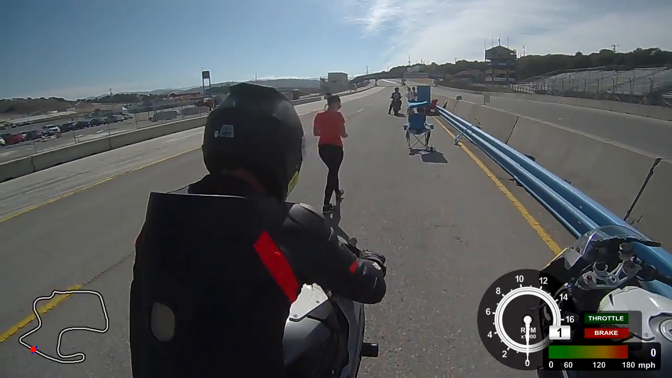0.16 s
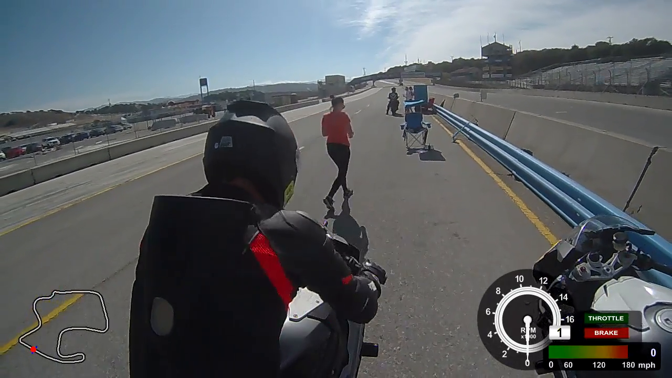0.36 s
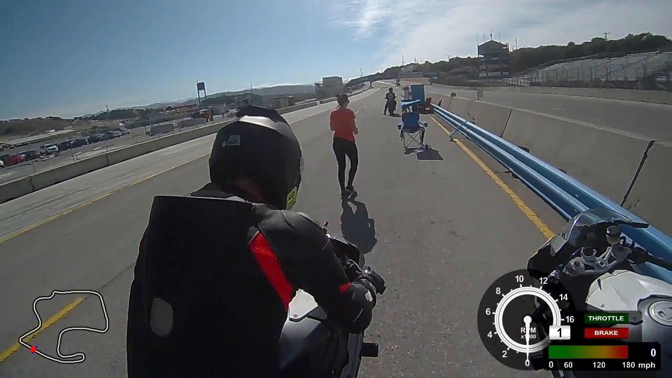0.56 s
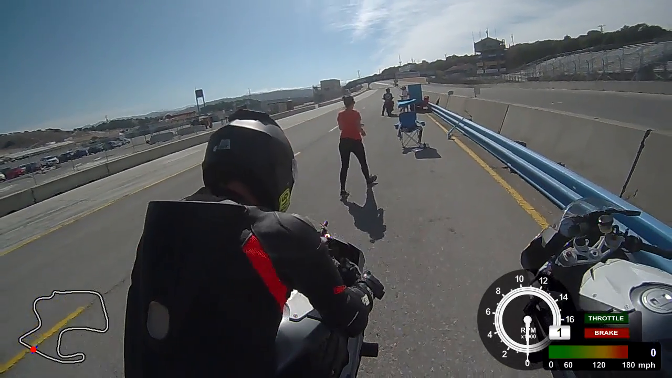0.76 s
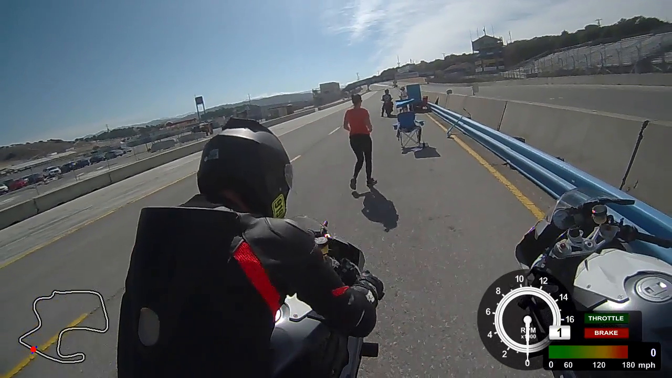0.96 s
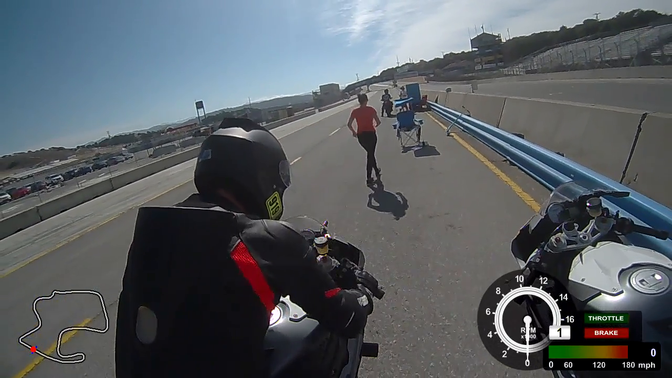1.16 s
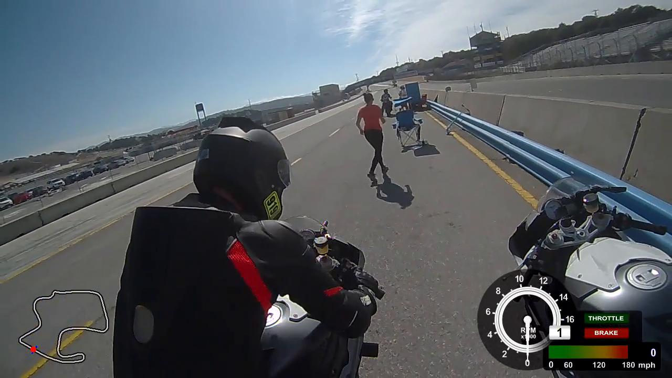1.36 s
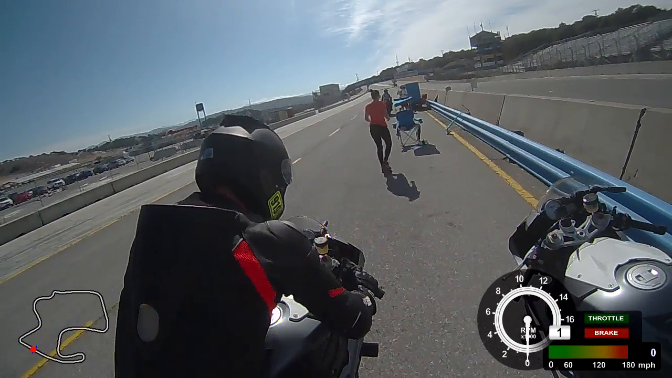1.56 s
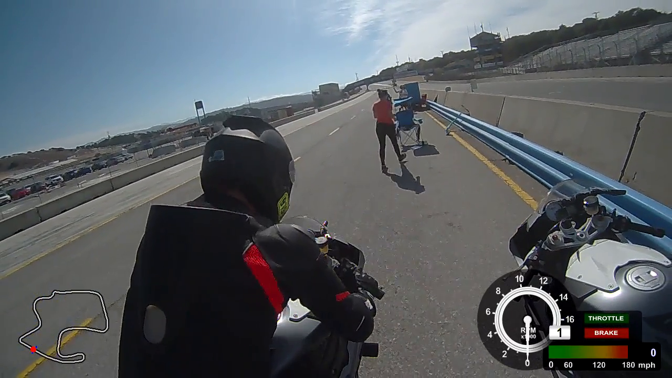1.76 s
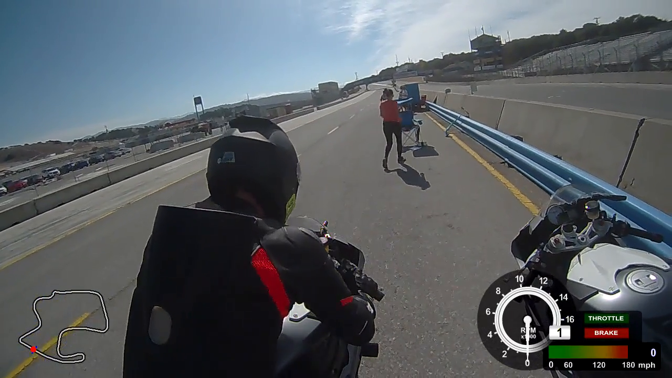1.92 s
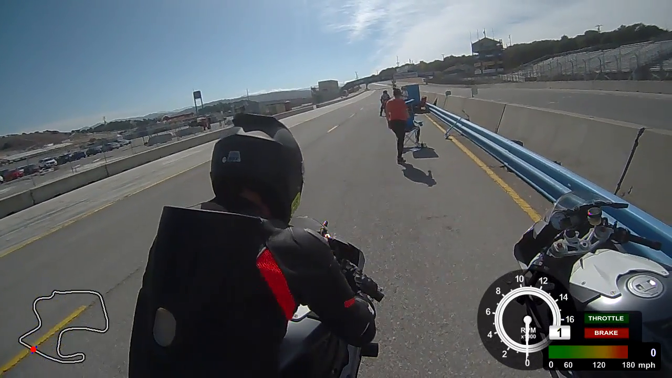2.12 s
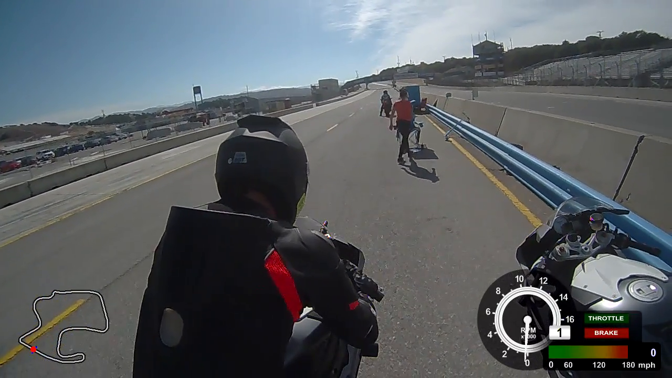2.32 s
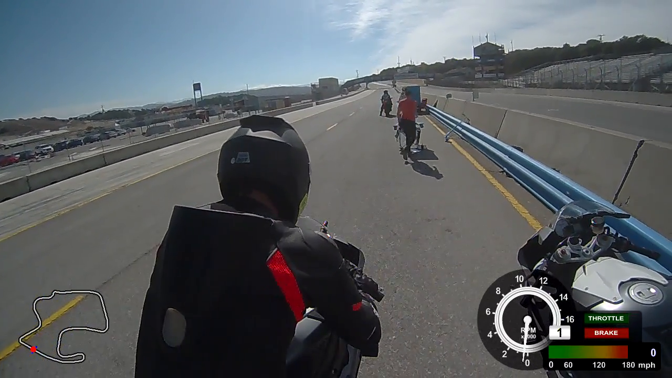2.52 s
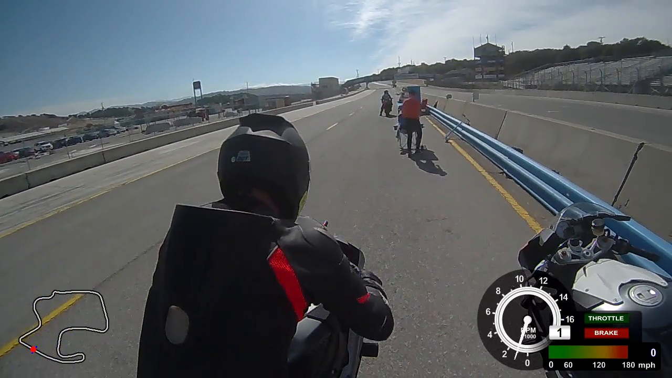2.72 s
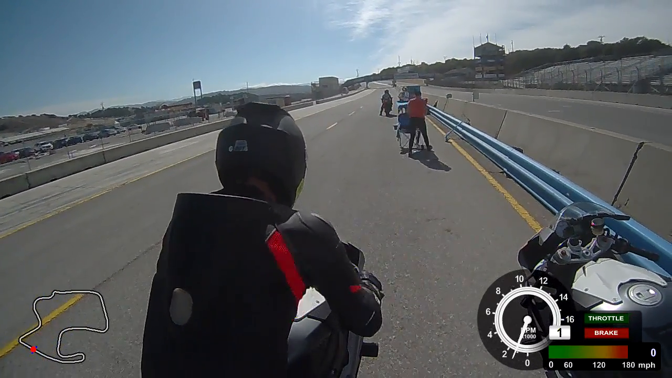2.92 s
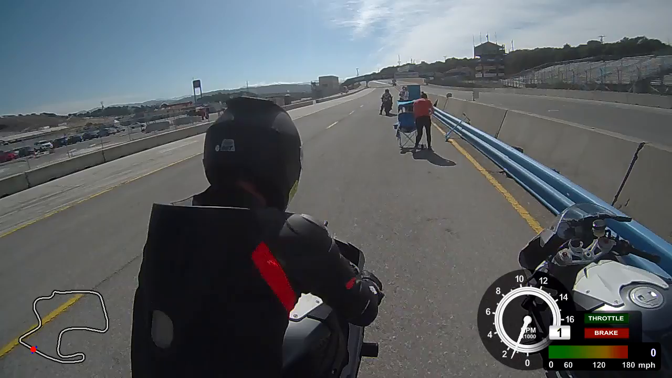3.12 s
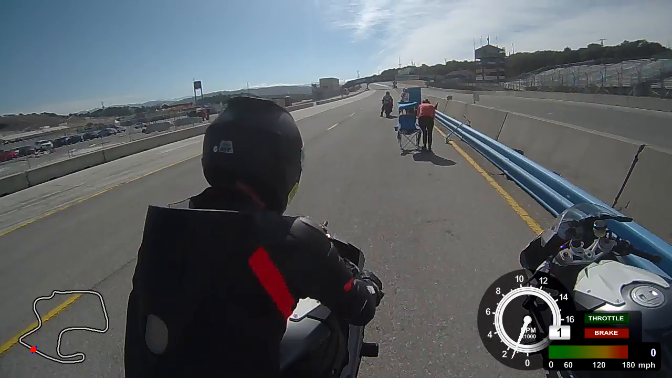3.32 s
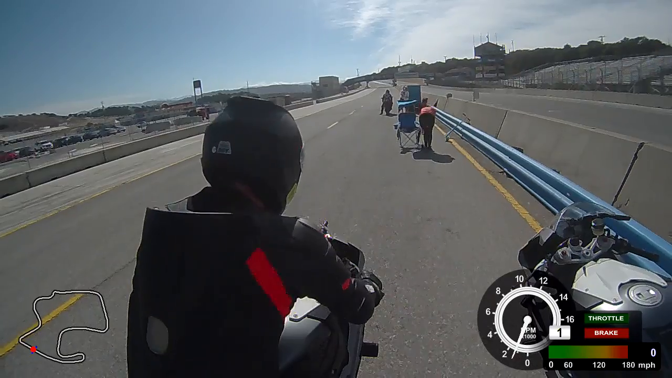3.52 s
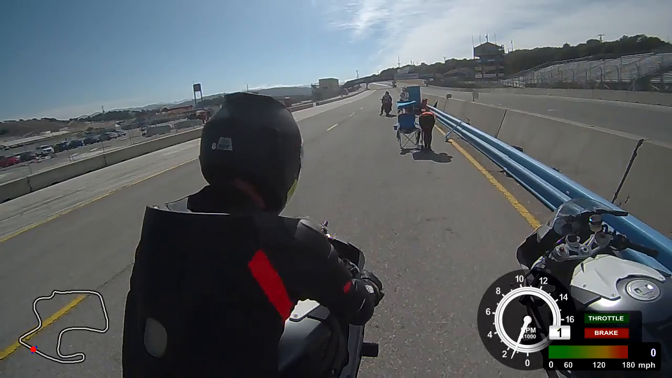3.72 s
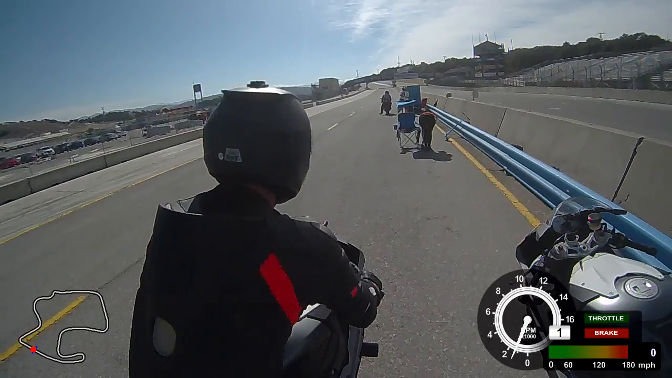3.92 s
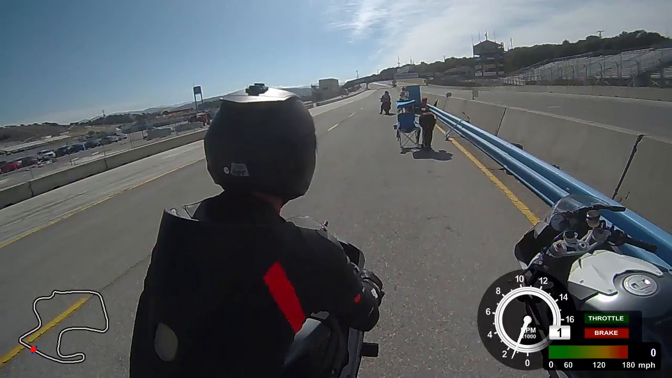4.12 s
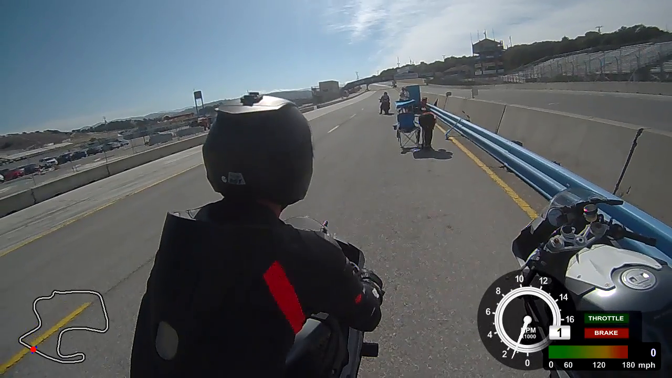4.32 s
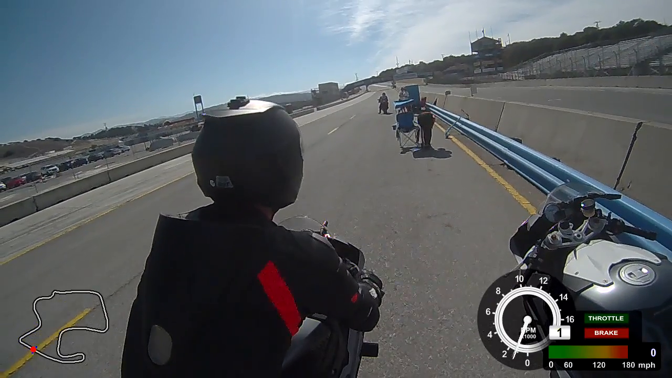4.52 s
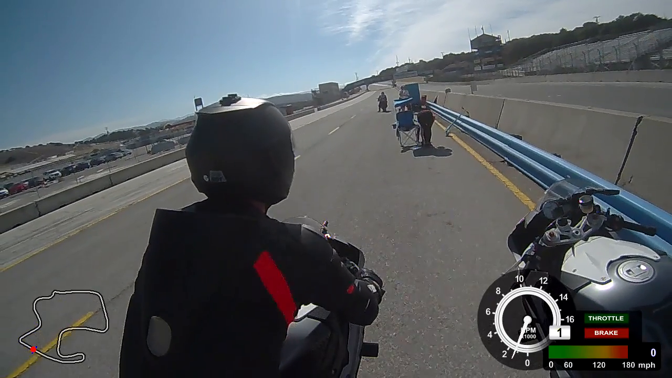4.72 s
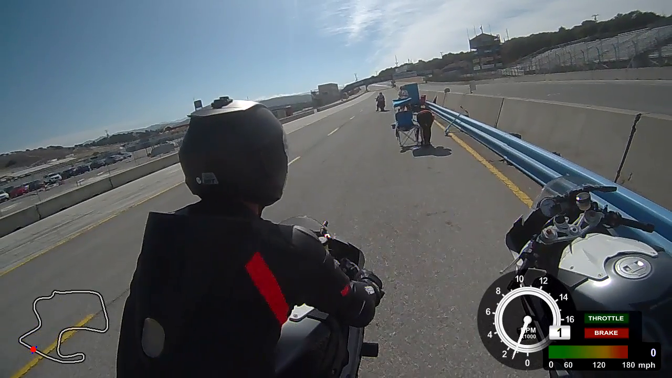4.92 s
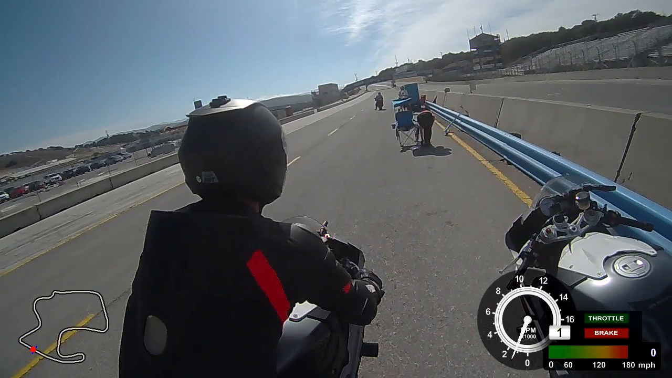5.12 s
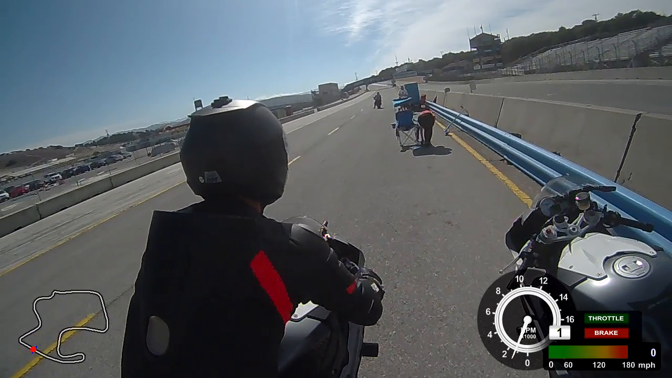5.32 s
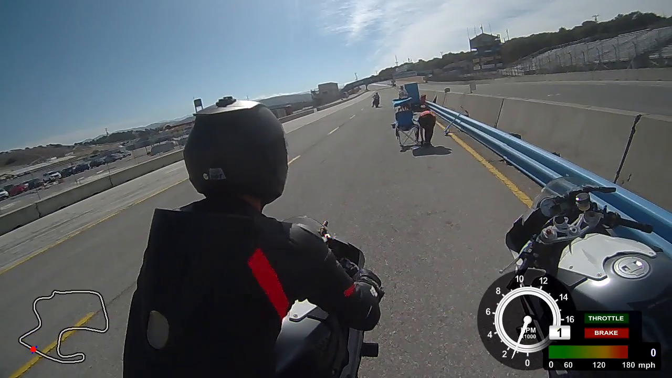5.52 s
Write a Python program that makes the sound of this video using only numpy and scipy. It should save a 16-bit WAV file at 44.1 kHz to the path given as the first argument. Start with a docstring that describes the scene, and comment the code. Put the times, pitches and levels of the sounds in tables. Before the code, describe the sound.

Close, mounted on the motorcycle: faint open-air wash with a few dull thuds and light taps, then a loud ringing metal clunk. The starter whines and grinds through several quick compressions, the four-cylinder engine catches with a small flare, and settles to a rattling idle with low exhaust putter and ticking valves until the end.

```python
"""In an open pit lane, a four-cylinder sport motorcycle clunks, is cranked, catches and settles to a rattling idle.
The microphone rides on a rigid mount, so knocks, starter gears and clatter are pulses, noise and tones
coloured by ringing resonances of the bodywork.
The exhaust putters underneath, puffs and firing orders filtered by the pipe, with dull thuds and light
taps before it, all over a faint wash of shaped noise."""
import sys
import numpy as np
from scipy import signal
from scipy.fft import rfft, irfft
from scipy.io import wavfile

SR = 44100
rng = np.random.default_rng(int(sys.argv[2]) if len(sys.argv) > 2 else 0)


def store_pcm(level_fs):
    """Save levels as 16-bit WAV."""
    pcm = np.round(np.clip(level_fs, -1, 1) * 32767).astype(np.int16)
    wavfile.write(sys.argv[1], SR, np.atleast_2d(pcm).T)


N = 250047
TIME = np.arange(N) / SR  # seconds
BINS = np.fft.rfftfreq(16384, 1 / SR)  # Hz, grid on which the filters are drawn

# Resonances of bodywork and mount. Each row: centre in Hz, half width in Hz, relative level in dB.
FRAME_MODES = [(553.5, 30.4, -10.5), (633, 49, -16), (780.6, 44, -11), (836, 21, -14.5), (978, 112, -12),
               (1110, 11, -12), (1209.6, 50.4, -7), (1344, 59, -12), (1446, 84, -17), (1613.7, 26, 1),
               (1704, 55, -8.5), (1926, 130, -24.5), (2306, 100, -19.5), (2427, 21, -20),
               (2791, 118, -14.5), (3095, 78, -20), (3526, 77, -14), (3840, 36, -15), (4095, 105, -9),
               (4328, 42, -8), (4680, 64, -19.5), (4970, 170, -23), (5310, 70, -24), (5740, 140, -19.5),
               (5980, 830, -40), (6100, 99, -23.5), (6300, 150, -57), (8300, 210, -58)]
# Resonances of the exhaust. Each row: centre in Hz, half width in Hz, relative level in dB.
PIPE_MODES = [(97, 38, -15.5), (123.8, 15, -5), (166.7, 16, 3.5), (210, 15, -2), (235.2, 13.4, 4.5),
              (250, 19, 0), (287.5, 12, 1), (303.6, 7.6, 0), (340.6, 10.7, 3.5), (370.3, 18.7, 0.5),
              (386, 29, -9), (434.7, 26, -0.5), (541.3, 9.6, -5)]
# Strength of each cylinder in firing order, relative, in dB.
CYLINDER_LEVELS = [0.7, -2, -3, -3.5]


def amp(db):
    """Decibels to gain."""
    return 10 ** (np.asarray(db) / 20)


def unit(x):
    """Scales to an rms of one."""
    return x / np.sqrt(np.mean(x ** 2) + 1e-20)


def curve(rows, axis=1):
    """One column of a time table at every sample."""
    rows = np.asarray(rows)
    return np.interp(TIME, rows[:, 0], rows[:, axis])


def slope(points):
    """Gain over frequency from (Hz, dB) points, straight lines in dB over log frequency."""
    hz, db = np.transpose(points)
    return amp(np.interp(np.log(BINS + 1), np.log(hz), db))


def peaks(modes):
    """Gain over frequency of a set of steep-sided resonances, summed in power."""
    power = sum((amp(db) / (1 + ((BINS - hz) / width) ** 2)) ** 2 for hz, width, db in modes)
    return np.sqrt(power)


def colour(x, gain):
    """Minimum-phase filter of the given spectral shape: resonances ring after what strikes them."""
    log_gain = np.log(np.maximum(np.r_[gain, gain[-2:0:-1]], 1e-6))
    response = np.fft.ifft(np.exp(np.conj(signal.hilbert(log_gain)))).real[:len(gain)]
    response = response / np.linalg.norm(response)  # white noise keeps its level
    return signal.oaconvolve(x, response)[:N]


def wander(hz):
    """Smooth random drift of rms one, up to about the given rate."""
    coarse = TIME[::16]
    rates = np.fft.rfftfreq(len(coarse), coarse[1])
    spectrum = rfft(rng.standard_normal(len(coarse))) * np.exp(-(rates / hz) ** 2)
    return np.interp(TIME, coarse, unit(irfft(spectrum, len(coarse))))


def strikes(turns, spread_db, jitter):
    """One impulse a turn, uneven in strength and a little early or late (s), scaled to an rms of one."""
    at = np.flatnonzero(np.diff(np.floor(turns)) > 0)
    size, late = np.clip(rng.standard_normal((len(at), 2)), -2, 2).T
    moved = np.clip(at + (late * jitter * SR).astype(int), 0, N - 1)
    out = np.zeros(N)
    out[moved] = amp(spread_db * size + np.resize(CYLINDER_LEVELS, len(at)))
    return unit(out)


def scrape(hits, decay):
    """Spreads each impulse into a short burst of noise whose power dies away over decay (s)."""
    power = signal.lfilter([1], [1, -np.exp(-1 / (decay * SR))], hits ** 2)
    return unit(np.sqrt(power) * rng.standard_normal(N))


def burst(s, decay):
    """Envelope that rises quickly at s and dies away."""
    age = np.clip((TIME - s) / decay, 0, 20)
    return np.exp(-age) * (1 - np.exp(-10 * age))


def swell(s, width):
    """Smooth hump about the time s."""
    return np.exp(-((TIME - s) / width) ** 2)


def pit_lane():
    """Faint, distant wash: noise of a fixed spectrum whose level drifts slightly."""
    # Spectrum of the open air. Each row: frequency in Hz, relative level in dB per Hz.
    air_spectrum = [(12, -38), (20, -21), (49, -1), (81, -9), (327, -6), (391, -10), (422, -8), (572, -10),
                    (952, -12), (1110, -12), (2090, -14.5), (3480, -15), (7270, -21.5), (8680, -43.5),
                    (11300, -68.5), (19100, -120)]
    level_db = -50 + 0.5 * wander(5)
    return amp(level_db) * colour(rng.standard_normal(N), slope(air_spectrum))


def thuds():
    """Low, quickly damped pushes with a round start, each a rough hum about its pitch."""
    # Dull thuds through the frame, the last ones the first firings.
    # Each row: start in seconds, relative level in dB, pitch in Hz, decay in seconds.
    thud_rows = [(.001, -35, 195, 0.039), (.536, -41.5, 173, 0.03), (.554, -40, 184, 0.035),
                 (1.15, -47, 194.5, 0.14), (1.434, -16.5, 164.5, 0.011), (2.397, -26, 166, 0.012),
                 (2.416, -16, 162, 0.012), (2.452, -23.5, 167.1, 0.023)]
    rise_s, rough = 0.005, 0.55
    body = 1 + rough * (wander(60) + 1j * wander(60))  # disturbs strength and phase
    out = np.zeros(N)
    for s, db, hz, decay in thud_rows:
        age = np.clip(TIME - s, 0, 20 * decay)
        envelope = np.exp(-age / decay) * (1 - np.exp(-age / rise_s))
        hum = (body * np.exp(2j * np.pi * hz * age)).imag
        out += amp(db + 1) * envelope * hum
    return out


def taps():
    """Light taps of the controls: short, damped pings roughened by a wandering phase."""
    # Each row: start in seconds, pitch in Hz, relative level in dB, decay in seconds.
    tap_rows = [(1.181, 845, -39, 0.016), (1.181, 1665, -43, 0.019), (1.588, 1610, -45, 0.018)]
    out = np.zeros(N)
    for s, hz, db, decay in tap_rows:
        ping = np.sin(2 * np.pi * hz * (TIME - s) + wander(110))
        out += amp(db + 6) * burst(s, decay) * ping
    return out


def knocks():
    """Hard metal contacts crack through the frame and leave the metal ringing and buzzing."""
    # Metal parts knocking home. Each row: start in seconds, relative level in dB, contact decay in seconds.
    contacts = [(1.431, -29, .002), (1.4336, -3.5, 0.0036), (1.4389, -4.5, 0.0027), (1.4426, -16, 0.0019),
                (1.447, -19, 0.0019)]
    # Long ring of the struck metal. Each row: pitch in Hz, relative level in dB, time to fall 60 dB in seconds.
    metal_modes = [(49.3, -18, 0.68), (154, -6, 0.21), (220, -8, 0.28), (288, -17, 0.57), (740, -2.5, 0.22),
                   (836, -13, 0.31), (1034, -7, 0.35), (1140, -13, 0.37), (1207, -1.5, 0.18),
                   (1315, -6.5, .22), (1380, -2.5, 0.24), (1603, 2, .14), (1720, -15, 0.35),
                   (2340, -22, 0.35)]
    # How the knocks drive the frame. Each row: frequency in Hz, gain in dB.
    crack_tilt = [(450, -21), (600, -10), (800, 4), (1100, 6), (1400, 4.5), (1620, 1), (2300, -2.5),
                  (4200, -4), (6000, 1), (8000, -8)]
    # How the buzz drives the frame. Each row: frequency in Hz, gain in dB.
    buzz_tilt = [(60, -8), (200, -3), (500, -2.5), (1300, 0), (2000, -10), (4300, -8.5), (7000, -22)]

    contact = sum(amp(db) * burst(s, decay) for s, db, decay in contacts)
    force = amp(-1.5) * contact * rng.standard_normal(N)
    for s, db, _ in contacts:
        force[round(s * SR)] += amp(db + 13)  # the first touch is a bare impulse
    crack = colour(force, peaks(FRAME_MODES) * slope(crack_tilt))

    start = contacts[1][0]  # ring, buzz and boom begin with the second contact
    age = np.maximum(TIME - start, 0)
    ring = np.zeros(N)
    for hz, db, t60 in metal_modes:
        level_db = db - 60 * age / t60 + 2 * wander(70)
        ring += amp(level_db) * np.sin(2 * np.pi * (hz * age + rng.random()))
    ring *= 1 - np.exp(-age / 0.00095)  # quick rise

    buzz_noise = burst(start, decay=0.022) * rng.standard_normal(N)
    buzz = colour(buzz_noise, np.sqrt(peaks(FRAME_MODES)) * slope(buzz_tilt))
    boom_noise = burst(start, decay=0.06) * rng.standard_normal(N)
    boom = colour(boom_noise, np.sqrt(peaks(PIPE_MODES)))
    return amp(1.5) * crack + amp(-20.5) * ring + amp(-16.5) * buzz + amp(-30.5) * boom


def starter():
    """Gear teeth grind and whine; at each compression their pitch jumps up and sinks back under the load."""
    # The starter spins up, then labours until the engine takes over.
    # Each row: time in seconds, gear whine in Hz outside the compressions, relative load in dB.
    cranking = [(1.839, 899.3, -23.5), (1.885, 1602, -19), (1.918, 2336, -17.5), (1.958, 2227, -14),
                (1.99, 1622, -20), (2.03, 1699, -27.5), (2.38, 1775, -26)]
    # Each compression loads the gears.
    # Each row: start in seconds, length in seconds, relative grinding level in dB, relative ring level in dB.
    strokes = [(1.963, 0.045, -32.5, -11), (2.049, 0.051, -18.5, -17), (2.121, .055, -21.5, -11),
               (2.194, 0.05, -19, -20), (2.269, .056, -19.5, -11), (2.337, 0.035, -35, -29),
               (2.393, 0.031, -14.5, -22)]
    # Other tones of the gear train, most below the whine and one above it.
    # Each row: share of the whine frequency, relative level in dB.
    gear_tones = [(1 / 4, 1.3), (3 / 8, 0), (1 / 2, 0), (3 / 4, -7), (5 / 4, -15)]
    # Resonances that the whine excites. Each row: centre in Hz, half width in Hz, relative level in dB.
    whine_modes = [(1650, 85, 7), (2320, 110, -7.5)]
    # How the gears drive the frame. Each row: frequency in Hz, gain in dB.
    gear_tilt = [(450, -12.5), (600, -6), (800, 2), (1200, -0.5), (1620, 1), (2300, 1), (3000, 0),
                 (4200, -3), (6000, -8.5), (7000, 0.5), (8000, 0.5)]

    # the gears bite at once and drop out quickly
    engage_s, release_s = 0.003, 0.03
    start, end = cranking[0][0], cranking[-1][0]
    engaged = np.clip((TIME - start) / engage_s + 0.5, 0, 1)
    engaged = engaged * np.exp(-np.maximum(TIME - end, 0) / release_s)
    bite = amp(-19) * burst(start + engage_s, 0.0073)
    load = engaged * amp(curve(cranking, axis=2)) + bite

    strain, ring_level, sag = np.zeros((3, N))
    for s, length, db, ring_db in strokes:
        stroke = np.clip((TIME - s) / length, 0, 1)
        strain += amp(db) * abs(np.sin(np.pi * stroke ** 0.58))
        sag += (TIME > s) * (1 - stroke)
        ring_level += amp(ring_db) * swell(s + 0.6 * length, 0.013)  # most ring past mid stroke

    mesh_hz = curve(cranking) * (1 + 0.5 * sag) + 30 * wander(120)
    mesh = np.cumsum(mesh_hz) / SR  # cycles of the whine
    teeth = scrape(strikes(mesh / 4, spread_db=1.0, jitter=0.00015), decay=0.00064)
    gears = np.zeros(N)
    for share, db in gear_tones:
        gears += amp(db + 2 * wander(50)) * np.sin(2 * np.pi * (share * mesh + rng.random()))
    gears = unit(gears)
    grinding = (load + strain) * (amp(-3) * teeth + amp(-13.5) * gears)
    grind = colour(grinding, peaks(FRAME_MODES) * slope(gear_tilt))

    rumble_level = amp(-11.5) * np.minimum(load, amp(-25)) + amp(-19) * strain
    rumble = colour(rumble_level * rng.standard_normal(N), peaks(PIPE_MODES))
    pump_hz = 175 + 20 * wander(69)
    pumping = amp(-11.5) * strain * np.sin(2 * np.pi * np.cumsum(pump_hz) / SR)

    # a clear whine only until the first compression, standing out where it crosses a resonance
    free = load * np.clip((strokes[0][0] - TIME) / engage_s, 0, 1)
    resonance = np.interp(curve(cranking), BINS, peaks(whine_modes))
    whine = amp(-2.5) * free * resonance * np.sin(2 * np.pi * mesh)

    # the slowing gears dwell on the strongest resonance of the frame
    ring_hz = 1605 + 40 * sag + 25 * wander(158)
    ring = ring_level * np.sin(2 * np.pi * np.cumsum(ring_hz) / SR)
    # the tones flutter with each turn of the pinion
    chatter = 1 + 0.068 * np.cos(2 * np.pi * mesh / 8) + 0.077 * wander(350)
    return amp(-3) * grind + rumble + pumping + amp(-1.5) * chatter * (whine + ring)


CATCH_S = 2.412  # the engine catches


def flare():
    """Effort of the engine: one at the catch, easing towards zero at idle."""
    settle_s = 0.27
    return np.exp(-np.maximum(TIME - CATCH_S, 0) / settle_s)


def firing_turns():
    """Running count of firings: the speed flares at the catch, then hunts about idle with a slight drift."""
    # Engine speed. Each row: time in seconds, firings a second.
    speed = [(2.45, 49.5), (2.54, 49.6), (2.79, 46.5), (3.01, 46.7), (3.3, 42.3), (3.6, 45.3), (3.98, 44.6),
             (4.34, 40), (4.51, 43.8), (4.73, 40.6), (5.08, 43.6), (5.6, 43), (5.67, 42.7)]
    return np.cumsum(curve(speed) * (1 + 0.007 * wander(14))) / SR


def exhaust(turns):
    """Uneven puffs and steady orders of the firing rate ring the pipe; the frame shakes with each firing."""
    # How the puffs drive the pipe. Each row: frequency in Hz, gain in dB.
    puff_tilt = [(130, -4.5), (175, -5.5), (215, -2.5), (540, -3)]
    # Steady exhaust tones before the pipe. Each row: multiple of the firing rate, relative level in dB.
    order_rows = [(2, 5.5), (3, 3), (4, 0.5), (5, -1), (6, -8.5), (7, -5), (8, 2), (9, -4), (10, -4)]
    # Low shake at the firing rate. Each row: time in seconds, relative level in dB.
    shake_levels = [(2.42, -46), (2.57, -36), (2.66, -50.5), (2.85, -40.5), (3.76, -43), (4.25, -50.5),
                    (4.5, -45.5), (5.67, -45.5)]

    puffs = strikes(turns, spread_db=4.0, jitter=0.00079)
    pistons = strikes(2 * turns + 0.281, spread_db=3, jitter=0.00069)
    pistons = pistons + strikes(3 * turns + 0.607, spread_db=0.5, jitter=0.0006)
    putter = unit(colour(puffs + amp(-0.5) * pistons, peaks(PIPE_MODES) * slope(puff_tilt)))

    uneven = turns + 0.006 * wander(22)  # the crank hurries and lags from one firing to the next
    orders = np.zeros(N)
    for multiple, db in order_rows:
        phase = 2 * np.pi * (round(multiple) * uneven + rng.random())
        orders += amp(db + 1.4 * wander(5.4)) * np.cos(phase)
    tones = unit(colour(orders, peaks(PIPE_MODES)))

    shake = amp(curve(shake_levels) - 0.5) * np.sin(2 * np.pi * turns)
    level_db = -36 + 4 * flare()  # louder at the catch
    return amp(level_db) * (amp(-1) * putter + amp(-3) * tones) + shake


def surging(turns):
    """Swing of the gear rattle (dB): with the engine cycle, by chance, and in surges with a lull after each."""
    # The slack gears rattle harder for a moment. Each row: time in seconds, extra level in dB.
    surge_rows = [(3.475, 4.5), (3.82, 4.5), (3.995, 6.5), (4.95, 7), (5.06, 4.5), (5.17, 5.5),
                  (5.232, 6.5)]
    cycle = 2 * np.cos(2 * np.pi * turns / len(CYLINDER_LEVELS))  # swells once in four firings
    sway = cycle + wander(14)
    surge_s, lull_after_s, lull_s, lull_share = 0.016, 0.047, 0.015, 0.9
    surges = np.zeros(N)
    for s, db in surge_rows:
        surges += db * (swell(s, surge_s) - lull_share * swell(s + lull_after_s, lull_s))
    return (1 - flare()) * sway + surges


def clatter(turns):
    """Gears knock across their backlash at each firing; valves and chain tick faster, all through the frame."""
    # How the gear rattle drives the frame. Each row: frequency in Hz, gain in dB.
    rattle_tilt = [(400, -4.5), (1000, -5.5), (1450, 3), (1620, -2.5), (1900, 7), (2400, -13), (8000, -15)]
    # How the valve train drives the frame. Each row: frequency in Hz, gain in dB.
    valve_tilt = [(400, 2), (1000, -1), (1350, -3.5), (1620, -4), (2200, -0.5), (8000, -4)]

    backlash = scrape(strikes(turns + 0.2, spread_db=1, jitter=0.0017), decay=0.01)
    rattle = unit(colour(backlash, peaks(FRAME_MODES) * slope(rattle_tilt)))
    # the frame's strongest resonance sings on between firings, swelling with each
    sing_hz = 1615 + 35 * wander(88.5)
    sing = np.sin(2 * np.pi * np.cumsum(sing_hz) / SR)
    sing = (1 + 0.35 * np.cos(2 * np.pi * turns)) * sing

    tappets = strikes(4 * turns, spread_db=1.0, jitter=0.0005)
    ticks = scrape(tappets, decay=0.0026) + amp(-5) * tappets
    chain = (1 + 0.5 * np.cos(2 * np.pi * turns)) * rng.standard_normal(N)
    valves = unit(colour(ticks + amp(-1) * chain, peaks(FRAME_MODES) * slope(valve_tilt)))

    surge = surging(turns)
    rattle_db = -34.5 + 4 * flare() + surge
    valves_db = -31 + 3.5 * flare() + 0.2 * surge  # the valve train surges far less
    gears = amp(-2) * rattle + amp(-7) * sing
    return amp(rattle_db) * gears + amp(valves_db) * valves


def scene():
    """The engine takes over from the starter as it catches."""
    turns = firing_turns()
    caught = np.clip((TIME - CATCH_S) / 0.013, 0, 1)
    engine = caught * (exhaust(turns) + clatter(turns))
    mix = pit_lane() + thuds() + taps() + knocks() + starter() + engine
    return mix[None]


def record(dry):
    """Soft overload on the hardest peaks, then the band limit."""
    ceiling, edge_hz = 0.9, 8350
    low_pass = signal.firwin(255, edge_hz, window=("kaiser", 8), fs=SR)
    limited = ceiling * np.tanh(dry / ceiling)
    return signal.oaconvolve(limited, low_pass[None], "same")


dry = scene()
out = record(dry)
store_pcm(out)
```